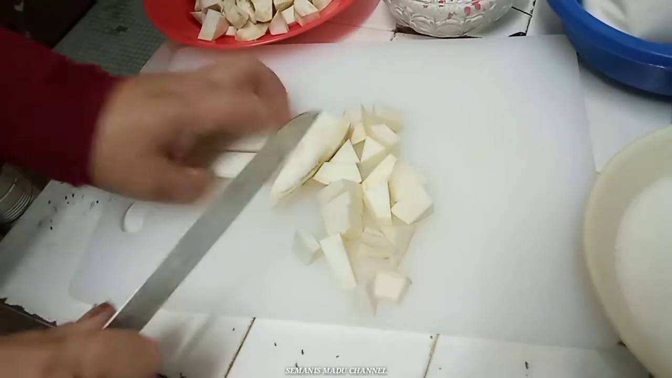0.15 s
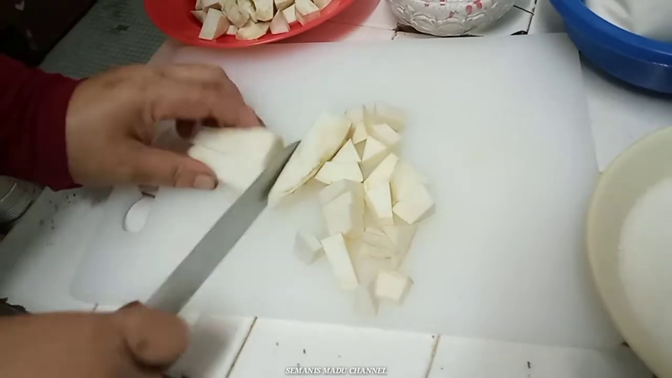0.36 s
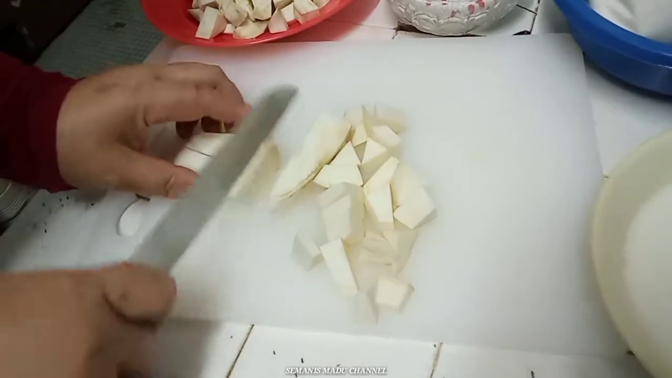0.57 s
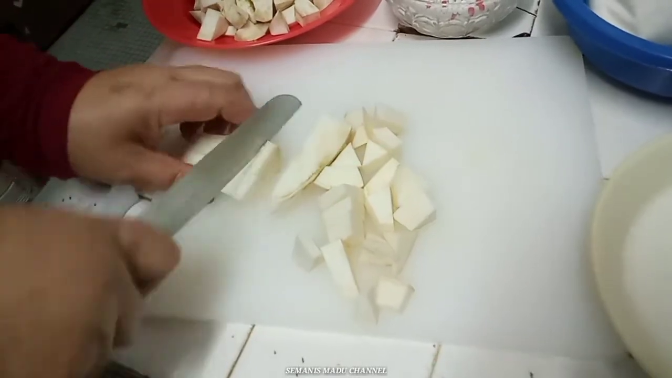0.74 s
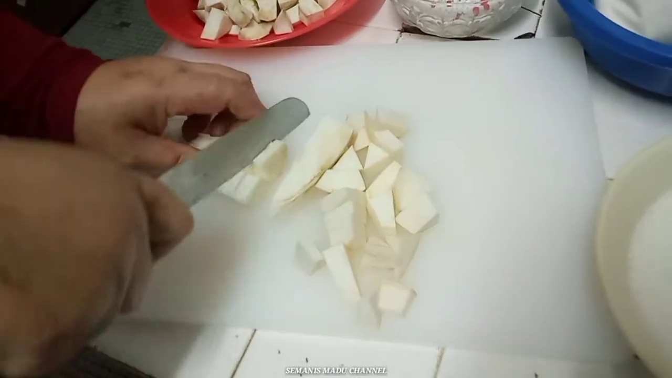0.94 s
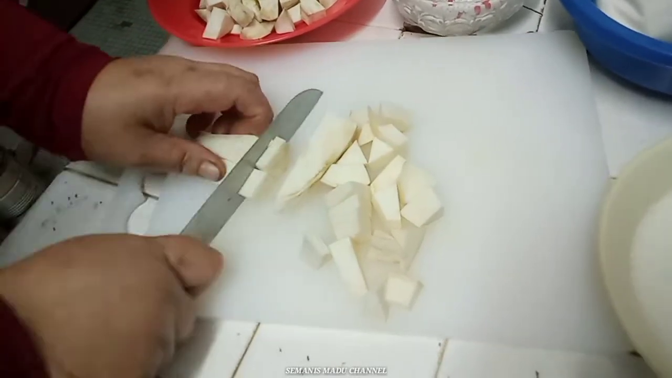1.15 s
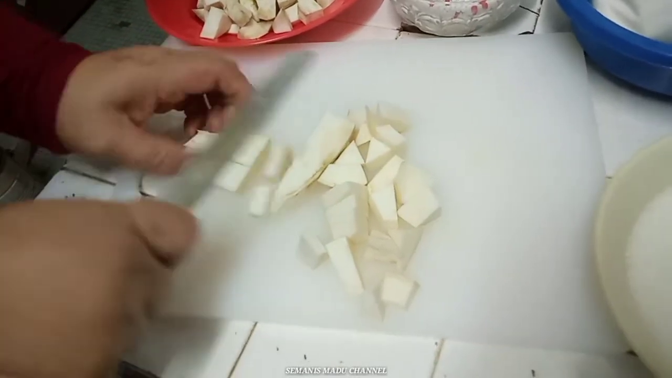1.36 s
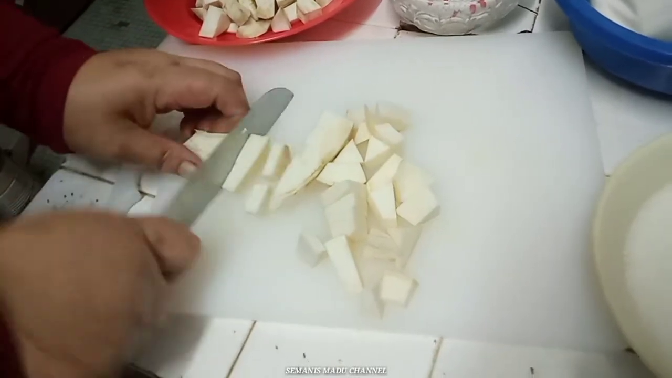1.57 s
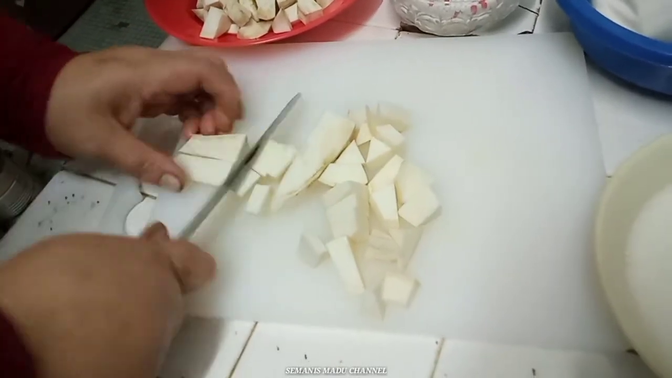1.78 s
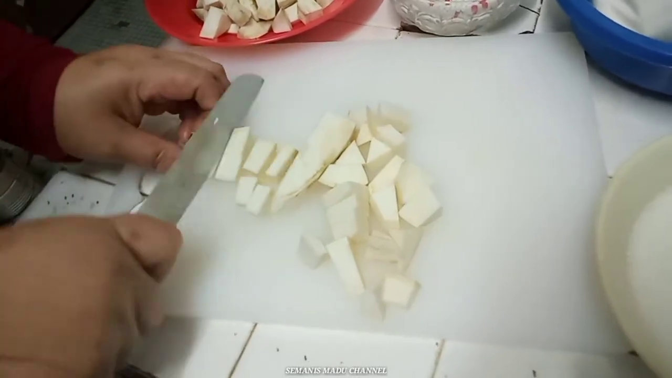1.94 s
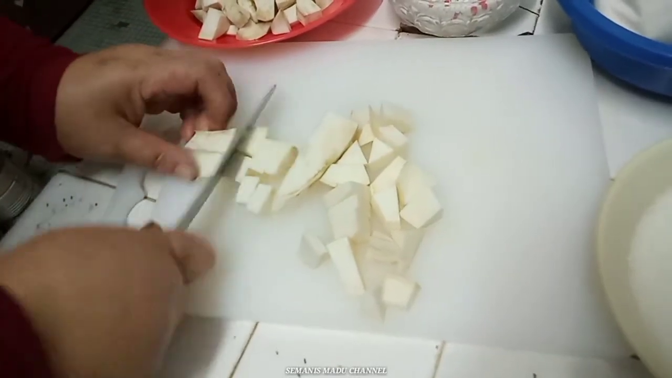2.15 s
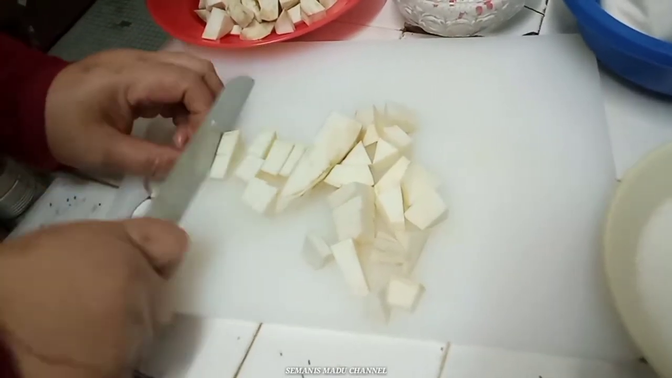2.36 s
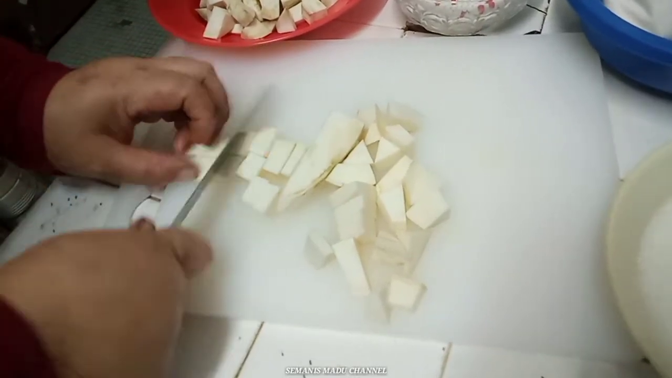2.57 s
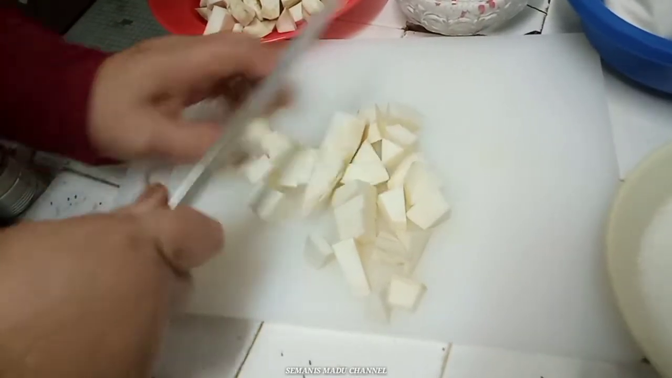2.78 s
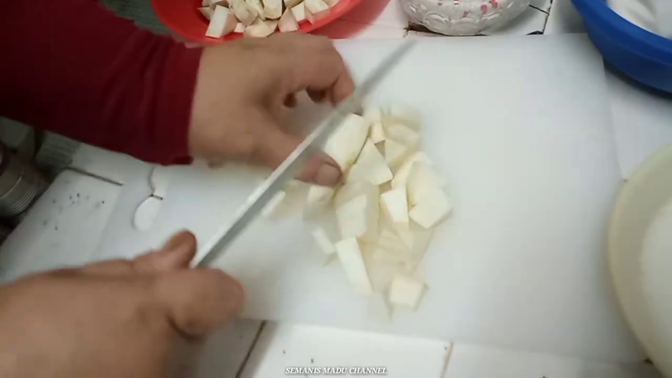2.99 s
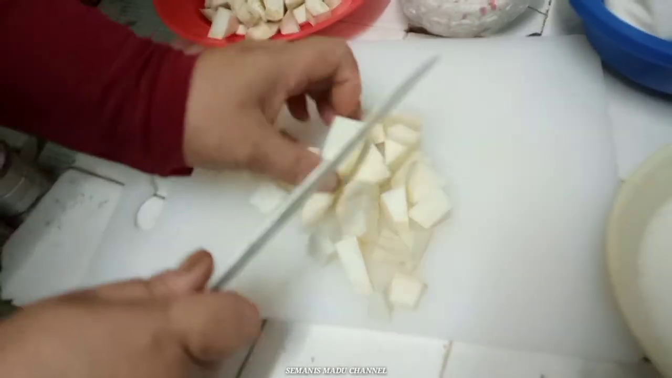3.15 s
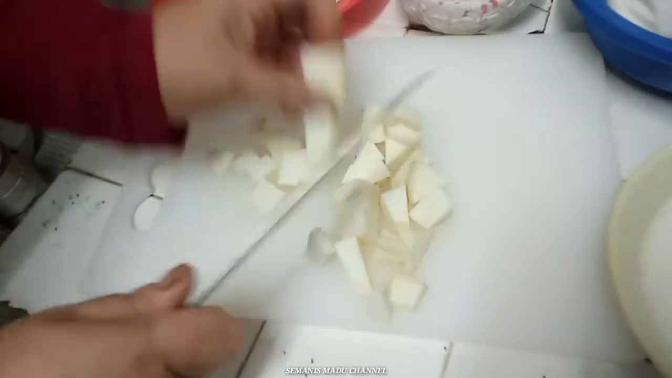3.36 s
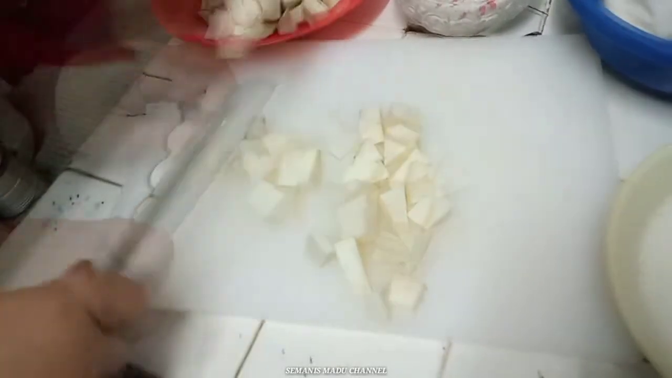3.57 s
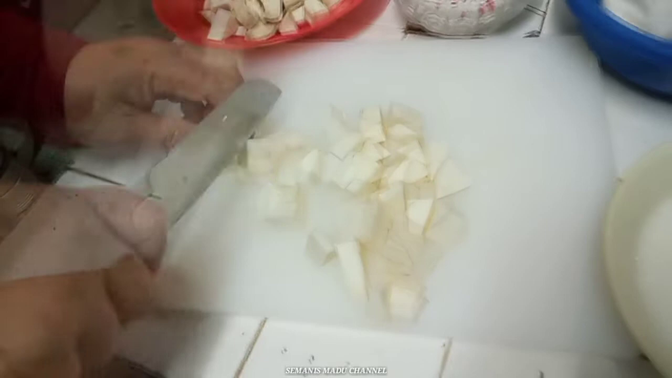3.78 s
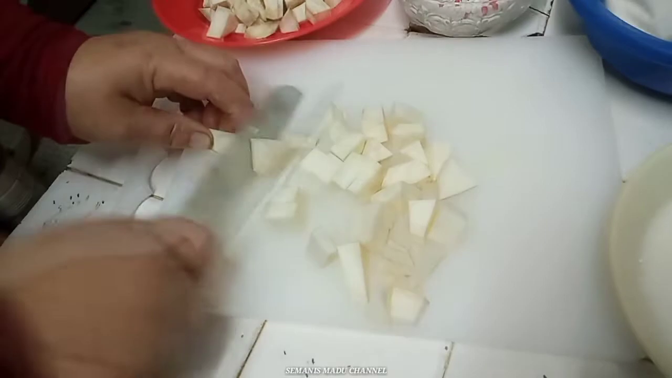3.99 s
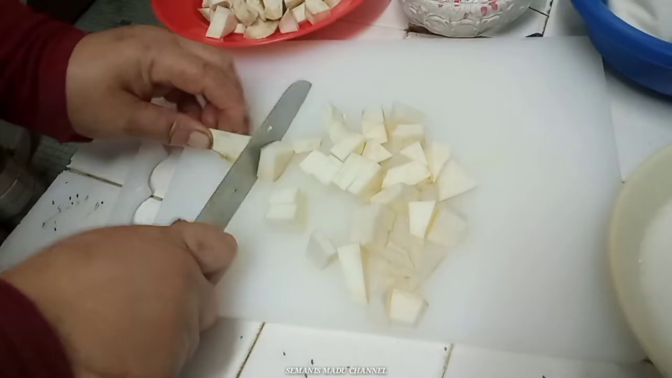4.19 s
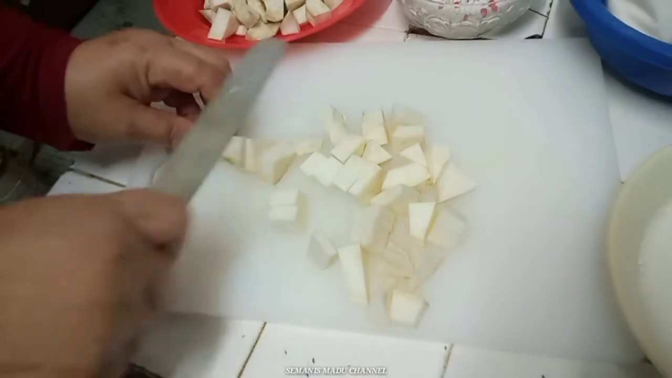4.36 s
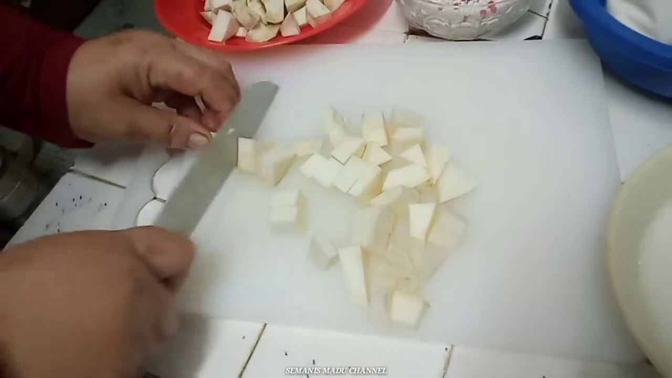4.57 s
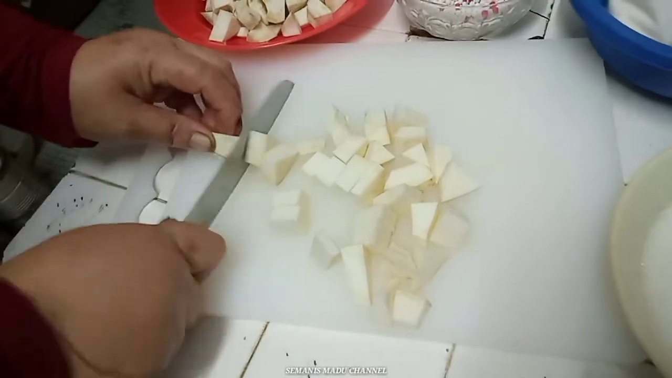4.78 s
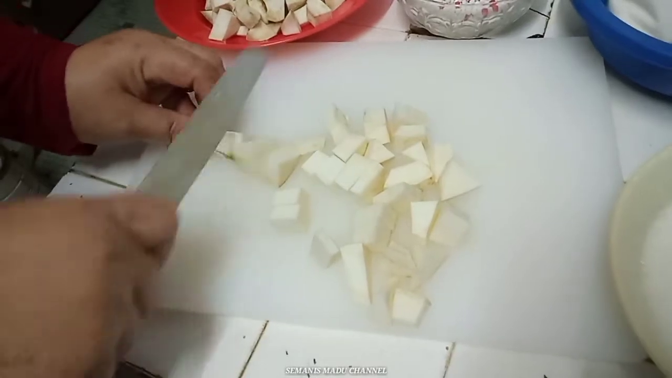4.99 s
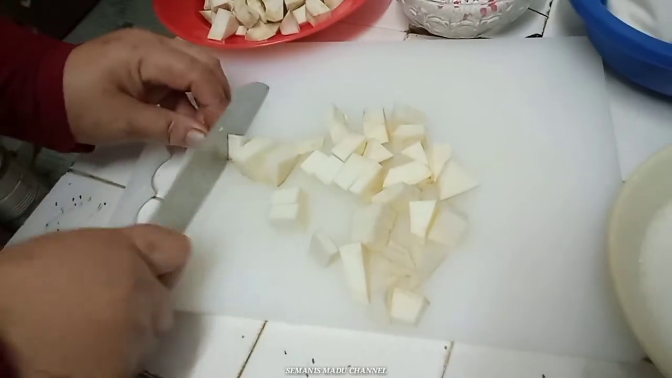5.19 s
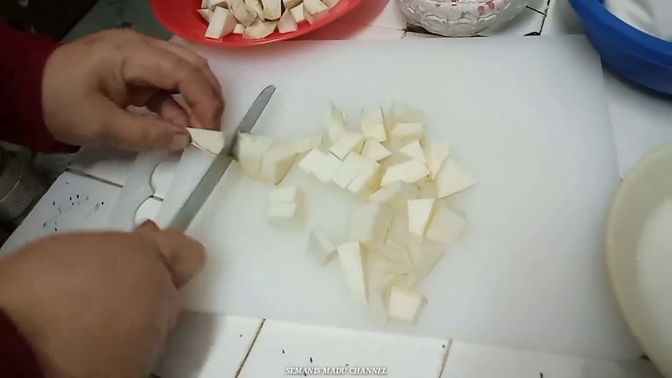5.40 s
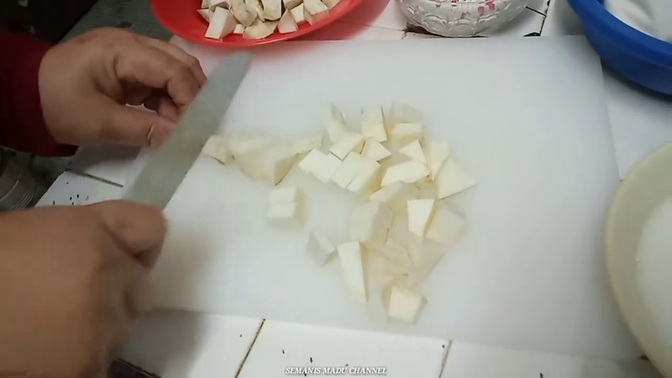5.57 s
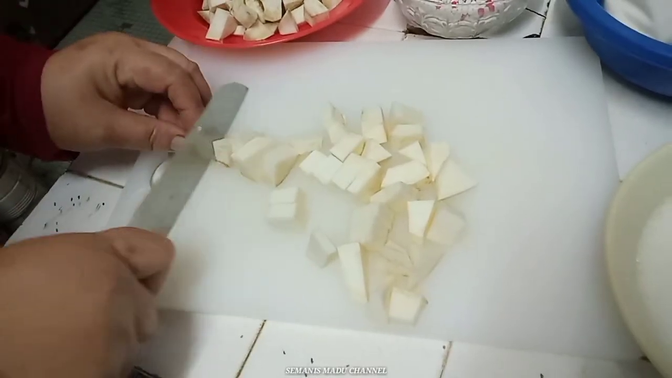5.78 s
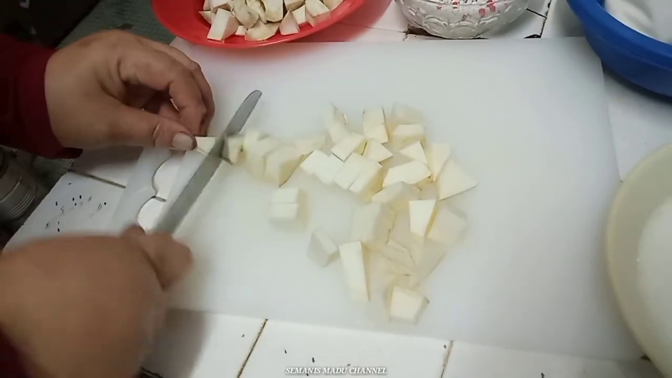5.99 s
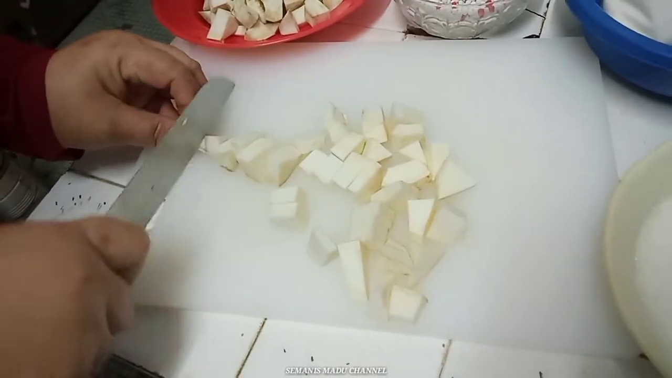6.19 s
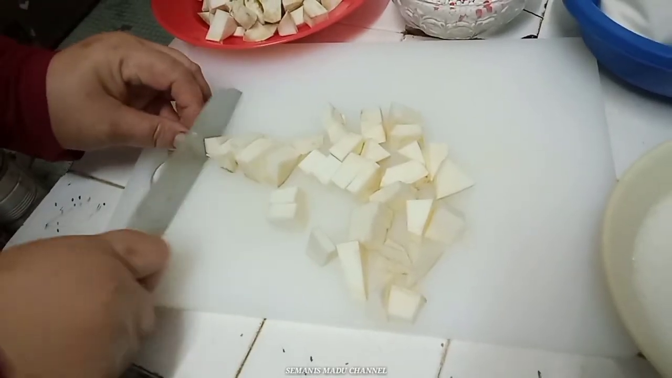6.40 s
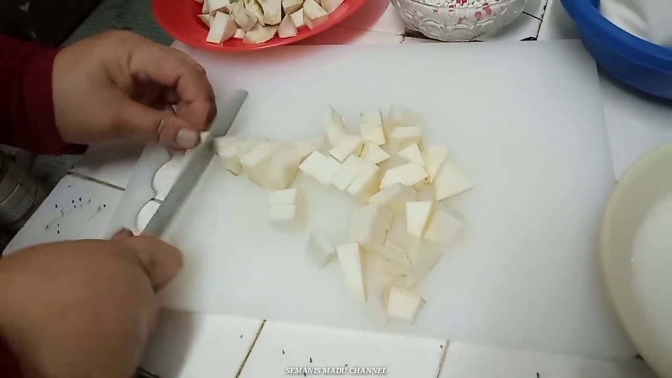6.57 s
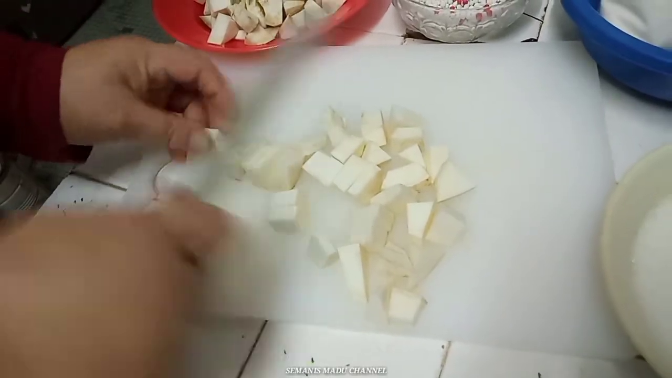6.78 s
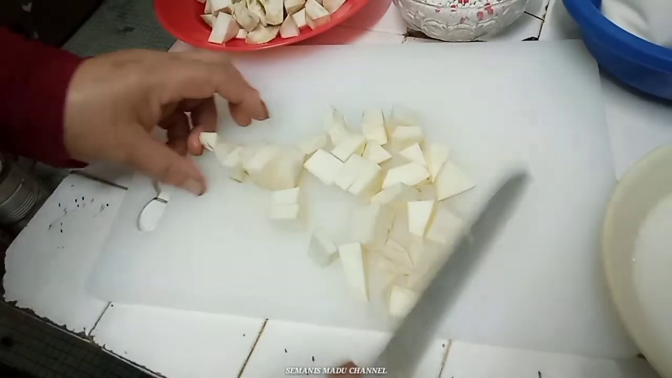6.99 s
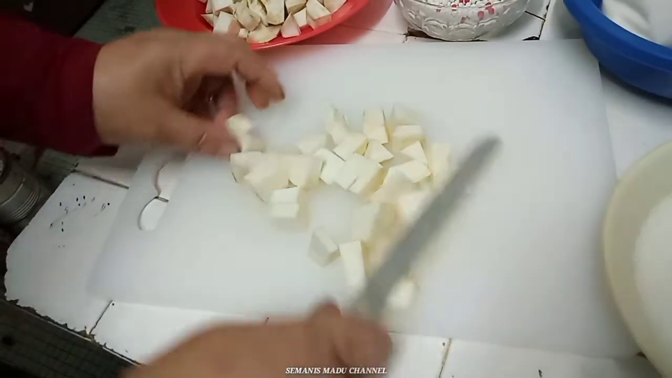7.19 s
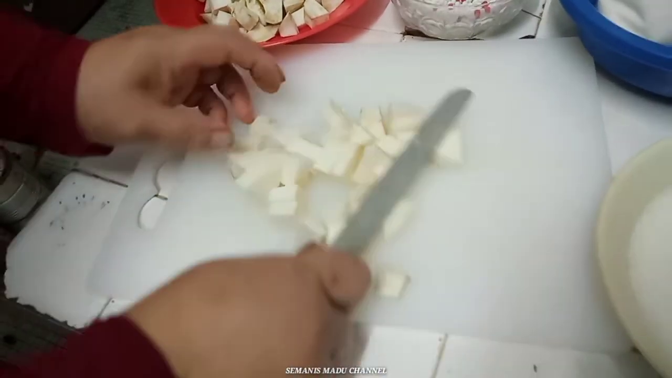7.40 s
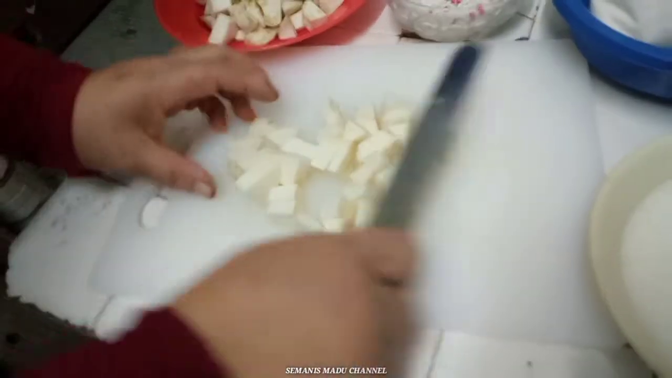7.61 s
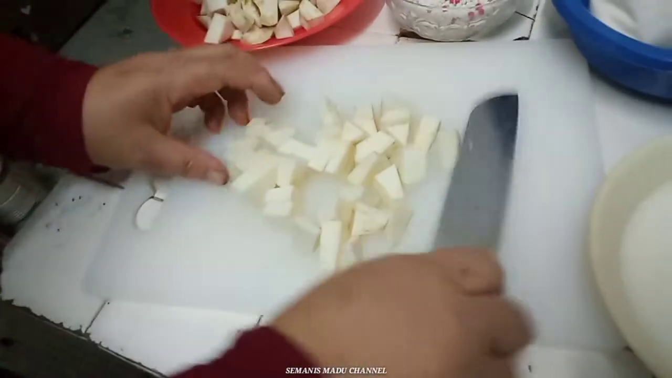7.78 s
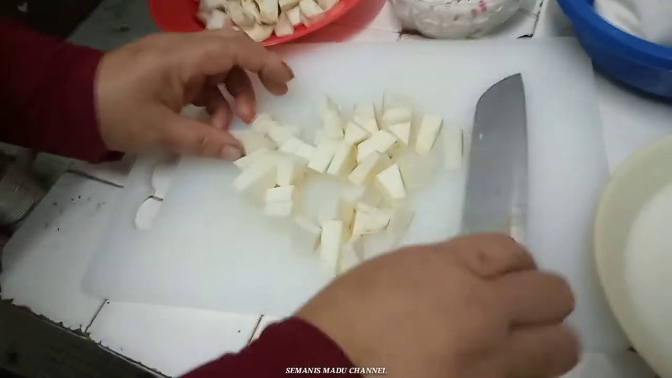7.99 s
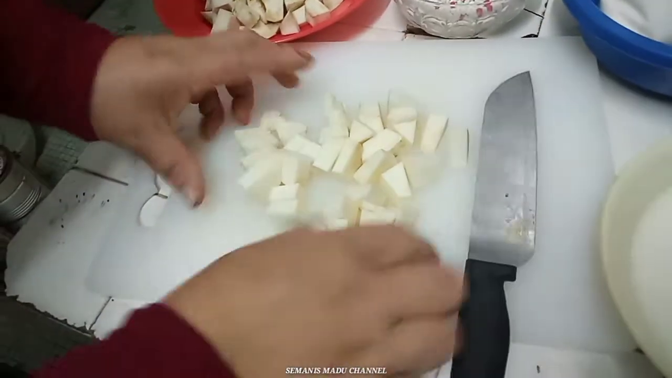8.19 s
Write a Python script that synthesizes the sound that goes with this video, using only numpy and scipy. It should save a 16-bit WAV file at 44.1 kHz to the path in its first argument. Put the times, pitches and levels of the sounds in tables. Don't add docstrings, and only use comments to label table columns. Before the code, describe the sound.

Irregular hard chops and light taps on a plastic cutting board, a brief full silence and slow fade-in, then the knife clatters down ringing.

```python
import sys
import numpy as np
from scipy import signal
from scipy.fft import rfft, irfft
from scipy.io import wavfile

SR = 44100
rng = np.random.default_rng(int(sys.argv[2]) if len(sys.argv) > 2 else 0)


def int16_out(signal):
    q = np.round(np.clip(np.atleast_2d(signal).T, -1, 1) * 32767)
    wavfile.write(sys.argv[1], SR, q.astype(np.int16))


def boost(x):
    u = np.asarray(x, float) / 20
    return 10 ** u


N = 363825

# t/s, peak/dB, low board resonance f/Hz, high over low resonance level/dB, room level/dB
BLOWS = [(.8418, -4, 950, -7, -17.5), (1.4635, -6.5, 694, 27, -27), (1.4661, -15, 720, 11, -20.5),
         (1.4735, -8.5, 800, -1, -19.5), (1.9494, 3.5, 1201, 12, -14), (2.3423, -2.5, 1144, 7.5, -11.5),
         (4.0287, 1, 1306, -30, -8), (4.679, -1.5, 910, -3.5, -9), (5.2668, 2.5, 1077, -7.5, -12.5),
         (5.8820, 4.5, 1133, 7.5, -9), (6.4470, 4.5, 1080, 5.5, -16)]


def rms_one(x):
    return x / np.sqrt(np.mean(x ** 2) + 1e-20)


def at_hz(rows, hz, column=1):
    rows = np.array(rows)
    return np.interp(np.log(hz), np.log(rows[:, 0]), rows[:, column])


def low_pass(x, top_hz, order):
    return signal.sosfilt(signal.butter(order, top_hz, fs=SR, output="sos"), x)


def band(x, low_hz, high_hz, order=2):
    return signal.sosfilt(signal.butter(order, [low_hz, high_hz], "band", fs=SR, output="sos"), x)


def resonate(x, hz, width_hz):
    r = np.exp(-np.pi * width_hz / SR)
    feedback = [1, -2 * r * np.cos(2 * np.pi * hz / SR), r * r]
    return signal.lfilter([(1 - r * r) / 2, 0, (r * r - 1) / 2], feedback, x)


def twice(x, hz, width_hz):
    y = resonate(resonate(x, hz, width_hz), hz, width_hz)
    return y / abs(y).max()


def add(out, s, x):
    i = round(s * SR)
    out[i:i + len(x)] += x[:max(N - i, 0)]


def muffle(x, top_hz=4200):
    return band(low_pass(x, top_hz, order=6), 180, 6500, order=1)


def hum():
    # f/Hz, density level/dB
    spectrum = [(15, -58.5), (25, -27.5), (144, -1), (233, -1), (274, -3), (469, -8), (582, -7), (871, -10),
                (970, -7.5), (2360, -18), (3720, -15), (5430, -34.5), (6730, -34.5), (10100, -51.5),
                (15500, -61.5)]
    # f/Hz, width/Hz, level/dB
    peaks = [(143, 400, -27.5), (460, 47, 6.5), (975, 34, -4), (1800, 190, -10), (4560, 490, -4.5),
             (6616, 570, 1), (8510, 700, 6.5)]
    hz = np.fft.rfftfreq(N, 1 / SR) + 1
    shape = boost(at_hz(spectrum, hz))
    for peak_hz, width_hz, db in peaks:
        shape *= 1 + boost(db) / (1 + (2 * (hz - peak_hz) / width_hz) ** 2)
    noise = irfft(shape * rfft(rng.standard_normal(N)), N)
    flutter = boost(1.0 * rms_one(band(rng.standard_normal(N), 16, 33, order=1)))
    return rms_one(noise) * flutter * boost(-39.5)


def kitchen(feed):
    # f/Hz, t60/s, level/dB
    decay = [(193.9, 0.16, -1), (476, 0.32, 9), (1020, .4, -2), (2080, 0.49, 1), (3300, 0.47, 3),
             (4540, .25, -3), (7950, 0.098, -23)]
    near_db, near_s = 12, 0.013
    far_db, far_delay_s, far_spread_s = 2, 0.043, 0.016
    t = np.arange(SR // 2) / SR
    edges = 150 * 2 ** np.arange(0, 6.1, 0.5)
    tail = np.zeros(len(t))
    for low, high in zip(edges, edges[1:]):
        hz = np.sqrt(low * high)
        fall = boost(at_hz(decay, hz, column=2) - 60 * t / at_hz(decay, hz))
        tail += fall * band(rng.standard_normal(len(t)), low, high, order=3)
    near = near_db * np.exp(-(t / near_s) ** 2)
    far = far_db * np.exp(-((t - far_delay_s) / far_spread_s) ** 2)
    tail *= 0.22 * (1 - np.exp(-t / 0.0051)) * boost(near + far)
    return signal.fftconvolve(feed, tail)[:N]


def thumps():
    # t/s, level/dB, f/Hz
    shakes = [
        (3.344, -34, 150),
        (4.681, -36, 113),
        (5.269, -34, 90),
        (8.02, -29, 75),
        (8.129, -33, 102),
        (8.18, -36, 104),
    ]
    out, t = np.zeros(N), np.arange(SR // 8) / SR
    for s, db, hz in shakes:
        add(out, s, boost(db) * np.sin(2 * np.pi * hz * t) * np.exp(-t / 0.023))
    return out


def treble_bursts(rows, length_s, top_hz):
    out, t = np.zeros(N), np.arange(1024) / SR
    for s, db in rows:
        burst = band(rng.standard_normal(len(t)) * np.exp(-t / length_s), 3000, top_hz, order=1)
        add(out, s, boost(db) * burst / abs(burst).max())
    return out


def crackles():
    # t/s, peak/dB
    fibres = [(1.21, -45), (1.3738, -48), (1.436, -45), (1.5351, -50), (1.704, -52), (1.8997, -46),
              (2.1056, -44), (2.2533, -44), (2.5047, -44), (4.5291, -43), (5.055, -49), (5.0974, -54),
              (5.1337, -43), (5.7194, -49), (5.7944, -46), (6.5879, -47), (7.796, -46)]
    return treble_bursts(fibres, length_s=0.005, top_hz=9000)


def snaps():
    # t/s, peak/dB
    edge_hits = [(0.8415, -42), (1.95, -2.5), (2.3416, -30), (4.6645, -47), (4.6793, -19.5), (4.6934, -40),
                 (5.2639, -44), (5.881, -30), (6.4456, -31), (8.0217, -6.5), (8.1296, -15), (8.2474, -21)]
    return treble_bursts(edge_hits, length_s=0.00025, top_hz=8000)


def knocks(rows, contact_s, ragged, damping, crack_db, spread, counter_db):
    # delay/s, level/dB
    echoes = [(.0022, -5.5), (.0045, -23.5), (0.0081, -11)]
    direct, feed, t = np.zeros(N), np.zeros(N), np.arange(2048) / SR
    click = 1.0 * (t == 0)
    for s, db, low_hz, high_hz, tilt_db, room_db in rows:
        contact = np.exp(-t / contact_s) * (1 - np.exp(-t / contact_s * 3))
        chatter = rng.standard_normal(len(t)) * contact
        push = ragged * chatter - click
        low = twice(push, low_hz, damping * low_hz)
        high = twice(push, high_hz, damping * high_hz)
        edge = twice(push, 1.42 * high_hz, 800)
        body = muffle(low + boost(tilt_db) * (high - boost(-10) * edge))
        body *= boost(db) / abs(body).max()
        add(direct, s, body + boost(db + crack_db) * band(chatter, 4500, 15000, order=1))
        for delay, echo_db in echoes:
            add(direct, s + delay, boost(echo_db + room_db - 6) * body)
        wide = twice(click, low_hz, spread * low_hz)
        wide = wide + boost(tilt_db - 7) * twice(click, high_hz, spread * high_hz)
        wide = low_pass(wide, 1.26 * high_hz, order=3)
        weight_db = counter_db + 18.5 - 16 * np.log2(low_hz / 1030)
        counter = boost(weight_db) * resonate(click, 320, 200)
        add(feed, s, boost(db + room_db - 7.0) * (wide + counter))
    return np.array([direct, feed])


def taps():
    # t/s, peak/dB, high resonance f/Hz, high over low level/dB, room level/dB
    touches = [(.978, -23, 1600, 5.5, -11.5), (1.065, -24, 1980, -15, -28), (1.21, -18, 3190, -3, -18.5),
               (1.274, -34, 2260, -15, -28), (1.374, -29, 3560, 16, -21), (1.433, -19, 2960, 4, -16),
               (1.705, -22.5, 3450, 9, -20), (1.879, -24, 2950, -3, -16), (1.903, -20, 3260, 7, -12),
               (1.922, -14.5, 2850, 10.5, -9), (2.104, -26, 1950, 6, -45), (2.253, -24.5, 3570, 6, -16),
               (2.283, -20.5, 2860, -1, -16), (2.307, -18.5, 2830, 16, -16), (2.315, -12.5, 2130, 1, -18.5),
               (2.506, -12.5, 1880, 4, -20.5), (6.360, -28, 2790, -1, -11), (6.587, -15.5, 2590, 12, -14),
               (7.147, -32.5, 1800, 2, -3), (7.536, -26, 1800, 5, -26), (7.566, -25.5, 2190, -8, -10),
               (7.797, -28.5, 3310, 17.5, -8.5)]
    rows = [(s, db, 1030, *rest) for s, db, *rest in touches]
    return knocks(rows, contact_s=0.0018, ragged=0.98, damping=0.45, crack_db=-53.5, spread=1.3,
                  counter_db=-4.5)


def laying_down():
    # t/s, peak/dB, high resonance f/Hz, high over low level/dB, room level/dB
    contacts = [
        (8.0191, -0.5, 2450, 21, -18),
        (8.0236, -2.5, 3300, 5.5, -9),
        (8.1167, -4.5, 2530, 4.5, -20),
        (8.1285, -3.5, 3500, 21, -15),
        (8.132, -4, 3100, 4.5, -14.5),
        (8.176, -11.5, 1610, 18, -9),
        (8.179, -12.5, 1750, -20, -5),
        (8.22, -10, 3300, 14, -7),
        (8.242, -12.5, 3300, -1, -20.5),
    ]
    rows = [(s, db, 650, *rest) for s, db, *rest in contacts]
    return knocks(rows, contact_s=0.0015, ragged=0.42, damping=0.78, crack_db=-29, spread=2.3,
                  counter_db=-8)


def blade():
    # f/Hz, level/dB, t60/s
    steel_modes = [(614, -1.5, 0.07), (1464, -10.5, 0.09), (1750, -10, 0.078), (3289, -12, 0.36),
                   (3563, -5.5, 0.11), (3813, -22.5, 0.3), (4105, -20, 0.69), (4580, -20, 0.2),
                   (6100, -22, 0.068), (8000, -23, 0.14), (8355, -21, .15), (9080, -15.5, 0.072),
                   (10280, -46.5, 0.097)]
    # t/s, level/dB, hand damps after/s, damping/dB, mode f/Hz
    pings = [
        (2.505, -13.5, 0.034, 29, 4105),
        (3.58, -32.5, .02, 18.5, 8355),
        (6.128, -36, .04, 20, 8355),
        (7.798, -20.5, 0.11, 8, 3289),
        (7.8, -34, .04, 16, 8355),
        (8.032, 3, 0.095, 8, 4105),
        (8.131, -4, .13, 5, 3289),
        (8.222, -5, .05, 5, 3813),
        (8.223, -24, .03, 8, 614),
    ]
    # t/s, level/dB, damped after/s, rattle/dB
    clangs = [
        (8.021, -8.5, 0.07, -28.5),
        (8.131, -11, 0.16, -29),
    ]
    out, t = np.zeros(N), np.arange(SR // 3) / SR
    strikes = []
    for s, db, free_s, held_db, hz in pings:
        nearest = min(steel_modes, key=lambda mode: abs(mode[0] - hz))
        strikes.append((s, db, free_s, held_db, [nearest], -120))
    for s, db, free_s, rattle_db in clangs:
        strikes.append((s, db, free_s, 8, steel_modes, rattle_db))
    for s, db, free_s, held_db, modes, rattle_db in strikes:
        damped = (1 - np.exp(-t / 0.001)) * boost(-np.clip(600 * (t - free_s), 0, held_db))
        for hz, level_db, t60 in modes:
            if hz > 5000 and len(modes) > 1:
                level_db += max(rattle_db + 26.5, -12)
            beat = 1 + 0.2 * np.sin(2 * np.pi * (hz / 90 * t + rng.random()))
            tone = np.sin(2 * np.pi * (hz * t + rng.random()))
            add(out, s, boost(db + level_db - 60 * t / t60) * beat * damped * tone)
        rattle = band(rng.standard_normal(len(t)), 5500, 9700, order=1)
        fall = boost(rattle_db - 60 * t / 0.069) + boost(rattle_db - 7.0 - 60 * t / 0.47)
        add(out, s, rattle * damped * fall)
    return out


def cutting():
    # start/s, end/s, rub/dB, creak/dB, crisp/dB
    strokes = [(0.932, 1.023, -34, -61, -62), (1.441, 1.466, -37, -47, -70),
               (1.508, 1.551, -37.5, -52, -71), (1.862, 1.94, -48, -43, -70), (2.1, 2.121, -33, -45, -68),
               (2.243, 2.34, -52, -51.5, -67), (3.424, 3.46, -37.5, -59, -71),
               (4.437, 4.683, -48, -48, -68), (5.105, 5.27, -45, -45, -66), (5.714, 5.85, -46, -46, -71),
               (6.305, 6.45, -44, -40.5, -66.5)]
    slips_per_s, slip_jitter, slip_s = 56, 0.2, 0.006
    press_share, let_go_s = 0.31, 0.0082
    clumps = boost(3 * rms_one(band(rng.standard_normal(N), 30, 82, order=1)))
    bursting = rng.random(N) < 7000 / SR
    clicks = bursting * boost(2.4 * rng.exponential(1, N)) * rng.choice([-1, 1], N) * clumps

    chance = rng.standard_normal((1000, 2))
    at = (np.cumsum(np.exp(slip_jitter * chance[:, 0])) * SR / slips_per_s).astype(int)
    starts, r = np.zeros(N), np.exp(-2 / (slip_s * SR))
    starts[at[at < N]] = boost(1.2 * chance[at < N, 1])
    slips = 0.5 + rms_one(signal.lfilter([1], [1, -2 * r, r * r], starts + 1e-18))

    rub = rms_one(muffle(band(clicks, 940, 3300, order=1)))
    creak = rms_one(resonate(resonate(slips * rng.standard_normal(N), 2830, 520), 2830, 520))
    crisp = rms_one(band(clicks + 2 * clumps * rng.standard_normal(N), 5000, 10000, order=1))
    out, t = np.zeros(N), np.arange(N) / SR
    for s, end, rub_db, creak_db, crisp_db in strokes:
        end = min([end] + [blow for blow, *_ in BLOWS if blow > s])
        build, release = (t - s) / (press_share * (end - s)), (end - t) / let_go_s
        press = np.clip(np.minimum(build, release), 0, 1)
        out += press * (boost(rub_db) * rub + boost(creak_db) * creak + boost(crisp_db) * crisp)
    return out


def chops():
    rows = [(s, db, hz, 1.93 * hz, *rest) for s, db, hz, *rest in BLOWS]
    return knocks(rows, contact_s=0.0013, ragged=0.31, damping=0.68, crack_db=-62, spread=1.14,
                  counter_db=1)


def ducking():
    # start t/s, depth/dB, hold/s
    dips = [
        (1.928, 9.5, 0.027),
        (2.322, -0.5, 0.019),
        (5.854, 6.5, 0.069),
    ]
    t, down_db = np.arange(N) / SR, np.zeros(N)
    for start, depth_db, hold in dips:
        recovery = np.exp(-np.maximum(t - start - hold, 0) / 0.0013)
        down_db += depth_db * np.clip((t - start) / 0.004, 0, 1) * recovery
    return boost(-down_db)


def silence_and_return():
    cut_s, cut_fade_s, back_s = 2.608, 0.02, 3.33
    fade_from_s, fade_s, fade_power = 3.184, 1.74, 1.63
    t = np.arange(N) / SR
    before = np.clip(1 - (t - cut_s) / cut_fade_s, 0, 1) ** 2
    after = np.clip((t - fade_from_s) / fade_s, 0, 1) ** fade_power
    return np.where(t < back_s, before, after)


def scene():
    chop, chop_feed = chops()
    tap, tap_feed = taps()
    drop, drop_feed = laying_down()
    cuts, steel = cutting(), blade()
    feed = chop_feed + tap_feed + boost(-4) * drop_feed + boost(-28.0) * cuts + boost(-22.0) * steel
    around = muffle(kitchen(feed), top_hz=4170) + hum() + steel
    close = chop + boost(-3.5) * tap + drop + thumps() + snaps() + crackles() + cuts
    return (close + ducking() * around)[None]


def top_cut(x):
    return signal.sosfilt(signal.butter(12, 16480, fs=SR, output="sos"), x)


def record(dry):
    flat = np.clip(dry * silence_and_return(), -1, 1)
    mix = signal.sosfilt(signal.cheby2(10, 22, 15600, fs=SR, output="sos"), flat)
    return top_cut(mix)


dry = scene()
out = record(dry)
int16_out(out)
```